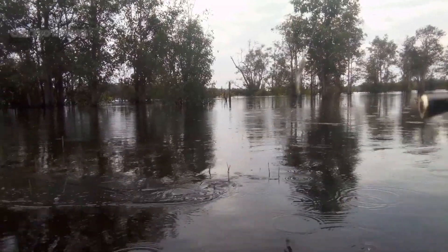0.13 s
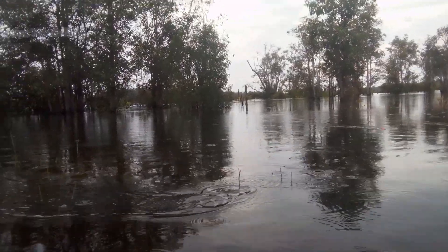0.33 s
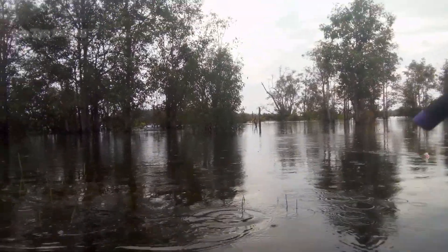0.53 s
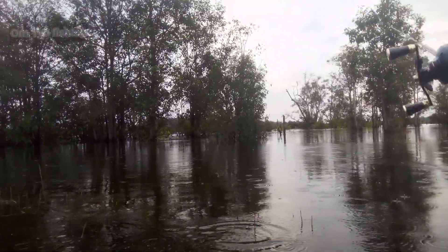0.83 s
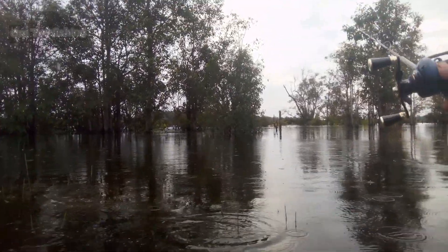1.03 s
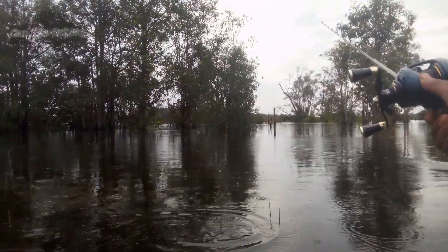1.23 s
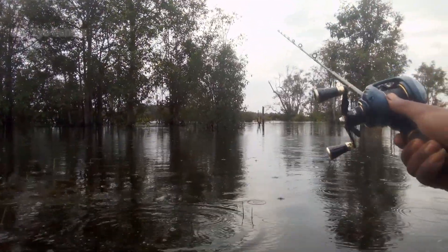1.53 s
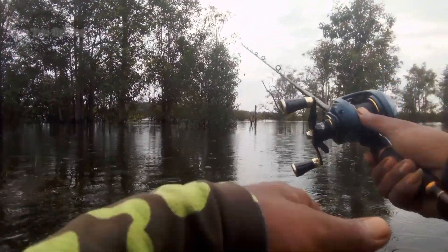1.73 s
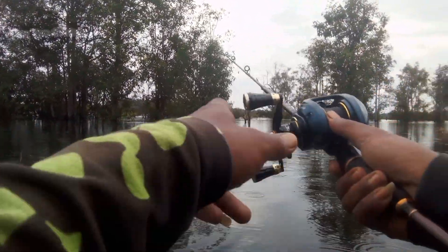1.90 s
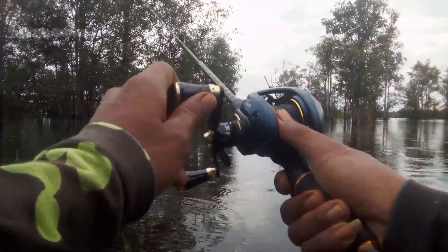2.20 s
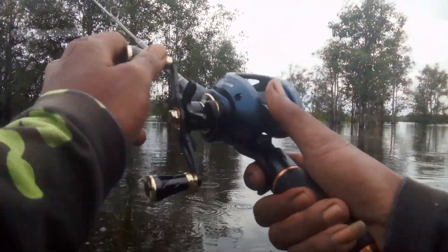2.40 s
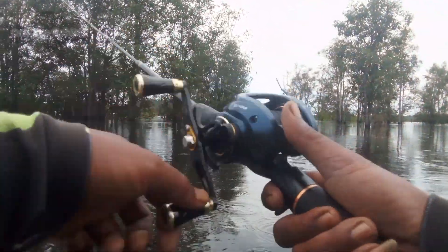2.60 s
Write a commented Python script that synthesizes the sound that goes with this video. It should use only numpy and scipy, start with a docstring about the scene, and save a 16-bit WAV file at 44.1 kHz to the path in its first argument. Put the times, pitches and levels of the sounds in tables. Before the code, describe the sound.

A fishing reel's free spool whirs through a cast, slows to a rattle, then clacks into gear

```python
"""Beside still water, a casting reel close to the microphone; a low wavering hum and patchy air lie under it all.
First drops and line guides plink (dying tones) and hands and reel click (noise bursts); a knock pushes the microphone.
The rod swings and line rips off in a coarse rush; the free spool rattles its frame with grains bunched once per turn,
hums at multiples of its speed and jolts as it slows, until the thumb stops it.
Last the clutch snaps in, ringing its modes, and the handle starts to rub the gears round."""
import sys
import numpy as np
from scipy import signal
from scipy.io import wavfile
from scipy.ndimage import uniform_filter1d

SR = 44100
rng = np.random.default_rng(int(sys.argv[2]) if len(sys.argv) > 2 else 0)


def materialize(psi):
    """Save the field psi as 16-bit PCM at rate SR to the path in sys.argv[1].

    A 1-D psi becomes a single channel; in a 2-D psi each row is a channel.
    """
    bounded = np.clip(np.atleast_2d(psi).T, -1, 1)
    quanta = np.round(bounded * 32767).astype(np.int16)
    wavfile.write(sys.argv[1], SR, quanta)


N = 121275


def amp(db):
    """Decibels to amplitude factor."""
    return 10 ** (np.asarray(db) / 20)


def rms_one(x):
    """Scale to rms 1."""
    return x / np.sqrt(np.mean(x ** 2) + 1e-20)


def in_time(rows):
    """Each column after the time, drawn as straight lines through its points."""
    times, *columns = np.transpose(rows)
    return [np.interp(np.arange(N) / SR, times, column) for column in columns]


def inside(rows):
    """One between the first and last row time, else zero."""
    t = np.arange(N) / SR
    return (t >= rows[0][0]) & (t <= rows[-1][0])


def level(rows):
    """Amplitude of a (t/s, level/dB) table, silent outside its times."""
    return amp(in_time(rows)[0]) * inside(rows)


def drift(rate_hz):
    """Slow chance of spread 1: white noise through a two-pole low-pass."""
    r = np.exp(-2 * np.pi * rate_hz / SR)
    noise = rng.standard_normal(N + SR)
    return rms_one(signal.lfilter([1], [1, -2 * r, r * r], noise)[SR:])  # first second lets it settle


def resonance(x, hz, width_hz):
    """One two-pole resonance."""
    r = np.exp(-np.pi * width_hz / SR)
    gain = (1 - r * r) / 2
    return signal.lfilter([gain, 0, -gain], [1, -2 * r * np.cos(2 * np.pi * hz / SR), r * r], x)


def body(x, peaks):
    """Parallel resonances, signs alternating; rms 1."""
    rings = [amp(db) * resonance(x, hz, width_hz) for hz, width_hz, db in peaks]
    return rms_one(sum((-1) ** k * ring for k, ring in enumerate(rings)))


def band(x, kind, hz, order=2):
    """Butterworth filter."""
    return signal.sosfilt(signal.butter(order, hz, kind, fs=SR, output="sos"), x)


def grains(per_s):
    """Random clicks of uneven size and sign, scaled so that their power does not follow their rate."""
    sizes_db = 3 * np.minimum(rng.exponential(1, N), 5)
    sizes = amp(sizes_db) * rng.choice([-1, 1], N)
    return sizes * (rng.random(N) < per_s / SR) / np.sqrt(per_s)


def since(start_s):
    """Seconds since the start, zero before it."""
    return np.maximum(np.arange(N) / SR - start_s, 0)


def dying(start_s, t60_s):
    """Exponential decay by 60 dB per t60, zero before the start."""
    t = since(start_s)
    return (t > 0) * amp(-60 * np.minimum(t / t60_s, 3))


# the free spool's speed: t/s, speed/(turns per s)
SPOOL_SPEED = [(.7, 148), (.76, 221), (.87, 205), (.97, 195), (1.05, 189), (1.2, 162), (1.29, 150),
               (1.46, 121.7), (1.65, 109.7), (1.76, 69), (1.95, 42.2), (2.09, 35.5), (2.25, 35.3),
               (2.36, 28)]


def spool_motion():
    """Speed in turns per second, and the angle in radians that it adds up to."""
    speed, = in_time(SPOOL_SPEED)
    return speed, 2 * np.pi * np.cumsum(speed) / SR


# delay of the path off a near surface, shrinking as the reel is brought in: t/s, delay/ms
NEAR_SURFACE = [(.7, .16), (.95, .156), (1.5, .14), (1.78, .136), (1.95, .122), (2.2, .113), (2.4, .112)]


def reflected(x):
    """Direct sound plus a weaker copy a fraction of a millisecond late; rms 1."""
    delay_samples = in_time(NEAR_SURFACE)[0] * SR / 1000
    late = np.interp(np.arange(N) - delay_samples, np.arange(N), x)
    return rms_one(x + 0.65 * late)


# overall rattle: t/s, level/dB
RATTLE_LEVEL = [(0.69, -71), (0.722, -38), (0.744, -29), (0.87, -37), (0.892, -33.5), (0.934, -38.5),
                (0.958, -35.5), (1.054, -42), (1.516, -39), (1.928, -42), (2.104, -47), (2.114, -45.5),
                (2.182, -47), (2.202, -42), (2.248, -52), (2.294, -40), (2.34, -51), (2.35, -85)]
# spread over the frame, added to the rattle: t/s, then low, middle, upper, bright and hiss level/dB
RATTLE_COLOUR = [(.69, 6, -12, -5, -22, -20), (.73, -2, -2.5, -10, -31, -29),
                 (.76, -5, -4.5, -14.5, -12, -15), (.8, -4, -5.5, -8, -7, -13.5),
                 (.86, -1.5, -1.5, -2.5, -3.5, -8.5), (.95, -2.5, -2, -6, -3, -10),
                 (1.1, -3.5, 0.5, -2, -2.5, -5.5), (1.28, -3.5, -2.5, -5, -15, -10),
                 (1.5, -3.5, -1, -10.5, -11, -12), (1.7, -4.5, -2.5, -13.5, -13, -16.5),
                 (1.9, -2, -2.5, -13.5, -16.5, -20.5), (2.05, -0.5, -5, -10, -20.5, -17),
                 (2.22, -3.5, -6.5, -14, -22, -20.5), (2.3, -1, -8, -14.5, -25, -25),
                 (2.35, -1, -3, -6, -26, -26)]
# resonances of the reel frame, from low ring to hiss: f/Hz, width/Hz, relative level/dB
LOW_RING = [(426, 123, -14), (757, 94, -7), (907, 74, -1), (1086, 45, -3), (1229, 59, 3), (1468, 213, -2),
            (1689, 89, 3)]
MIDDLE_RING = [(1937, 93, -1), (2140, 145, 0.5), (2340, 85, 3.5), (2599, 66, -3), (2894, 167, -2.5)]
UPPER_RING = [(3117, 76, -1), (3276, 23, -3.5), (3493, 96, 0), (4038, 134, -1), (4284, 36, 0.5),
              (4550, 1540, -12)]
BRIGHT_RING = [(5600, 800, -5.5), (5940, 130, 1), (6700, 310, 6.5), (7400, 700, -8.5)]
HISS_RING = [(8170, 1150, 0.25), (10260, 1300, 0.089), (11800, 1800, 0.096), (14500, 890, -1.9)]
GRAINS_PER_TURN, GRAIN_FLOOR_PER_S = 25, 2500
# swing once per turn; swing twice per turn, growing towards rest; chance wobble
TURN_SWING_DB, SECOND_LOBE_DB, WOBBLE_DB = 3, 5.5, 1.2


def bearing_rattle():
    """Bearing grains bunch with each turn and ring the frame; a second bunch grows as the spool slows."""
    speed, turn = spool_motion()
    slow = 1 - speed / speed.max()
    once = TURN_SWING_DB * np.cos(turn)
    twice = SECOND_LOBE_DB * slow ** 2 * np.cos(2 * turn)
    wobble = WOBBLE_DB * (drift(35) + .5 * drift(4))
    gate = amp(once + twice + wobble)

    rate = GRAINS_PER_TURN * speed + GRAIN_FLOOR_PER_S
    shared = grains(rate)
    # the treble is half noise and follows the turns less deeply
    smooth = gate ** 0.56 * (0.9 * shared + rng.standard_normal(N) * shared.std())
    rings = [
        band(body(gate * shared, LOW_RING), "low", 2860),
        body(gate * (.5 * shared + grains(rate)), MIDDLE_RING),
        body(gate * (1.2 * shared + grains(rate)), UPPER_RING),
        band(body(smooth, BRIGHT_RING), "high", 3900),
        reflected(band(body(smooth, HISS_RING), "high", 7100, order=3)),
    ]
    rattle = sum(amp(db) * ring for db, ring in zip(in_time(RATTLE_COLOUR), rings))
    return level(RATTLE_LEVEL) * rattle


# harder jolts of the slowing spool: t/s, level/dB (before a common 7 dB cut)
SPOOL_JOLTS = [(1.572, -24), (1.8, -28), (1.835, -33), (1.912, -27.5), (2.083, -29), (2.11, -30.5),
               (2.142, -31), (2.17, -31.5), (2.2, -26), (2.229, -29), (2.266, -30), (2.285, -24.5),
               (2.295, -30)]


def spool_jolts():
    """Each jolt is a short swell and decay of grains ringing the frame."""
    frame = body(grains(4400.0), LOW_RING[1:] + MIDDLE_RING)
    envelope = 0
    for start_s, db in SPOOL_JOLTS:
        attack = np.minimum(since(start_s) / 0.0014, 1)
        envelope = envelope + amp(db - 7) * dying(start_s, 0.029) * attack
    return frame * envelope


# hum at 1 to 4 times the spool speed: t/s, then four level/dB (before a common 4.5 dB lift)
UNBALANCE = [(.72, -80, -53, -57, -71), (.77, -56, -47, -58, -49.5), (.9, -50, -53.5, -61.5, -48),
             (1.0, -53.5, -62, -61, -71), (1.15, -53, -63, -65, -56.5), (1.3, -60.5, -75, -59, -98),
             (1.5, -59.5, -85, -56, -74), (1.64, -51, -81, -62.5, -65), (1.75, -75, -86, -87, -69),
             (1.9, -67, -90, -92, -85)]


def unbalance_tones():
    """The unbalanced spool hums at low multiples of its speed, with wavering phase and level."""
    _, turn = spool_motion()
    angle = turn + 0.185 * drift(11.6)
    tones = 0
    for multiple, db in enumerate(in_time(UNBALANCE), start=1):
        tones = tones + amp(db + 4.5 + 1.6 * drift(13)) * np.sin(multiple * angle)
    return inside(UNBALANCE) * tones


# line ripping off at the launch: t/s, level/dB
LAUNCH_LEVEL = [(.705, -69), (.722, -42.5), (.75, -30), (.77, -32.5), (.81, -27), (.825, -29), (.87, -50)]
# its broad colour: f/Hz, width/Hz, relative level/dB
LAUNCH_RING = [(1690, 340, -4), (1990, 320, 4), (2800, 530, -2.5), (3530, 280, 0.5), (8360, 1700, -12.5)]


def launch():
    """A short coarse rush of grains as line and spool are jerked up to speed."""
    return level(LAUNCH_LEVEL) * band(body(grains(5000.), LAUNCH_RING), "high", 620)


# touches as the clutch snaps in: t/s, level/dB (before a common 10 dB cut)
CLUTCH_TOUCHES = [(2.487, -28), (2.4895, -14.5), (2.4958, -22), (2.5003, -19.5), (2.5035, -30),
                  (2.5059, -23.5), (2.523, -47)]
# modes of the mechanism: f/Hz, relative level/dB, t60/s
MECHANISM_MODES = [(147, -12, 0.049), (930, -18, 0.044), (1790, -5, .012), (2250, -4.5, .015),
                   (2710, -8, 0.019), (3220, -9.5, 0.018), (3670, 3, 0.0063), (4550, -14, 0.0036),
                   (6220, -12, 0.015), (7130, -6, 0.008), (8200, -8.5, 0.0033), (10800, -8, 0.01),
                   (14400, -12, 0.0046)]
# chatter around the touches: t/s, level/dB (before it is scaled into crunch and modes)
CLUTCH_CHATTER = [(2.4865, -58), (2.492, -32), (2.509, -32), (2.516, -44.5), (2.528, -58)]


def clutch():
    """A few touches and a short chatter ring the modes of the mechanism, under a crunch of noise."""
    chatter = level(CLUTCH_CHATTER) * rms_one(grains(np.full(N, 1500.)))
    times, touch_db = np.transpose(CLUTCH_TOUCHES)
    envelope = sum(amp(db - 10) * dying(start_s, 0.0077) for start_s, db in CLUTCH_TOUCHES)
    snaps = envelope * rng.standard_normal(N)
    out = amp(0.5) * band(snaps + 0.34 * chatter, "band", [900, 12000], order=1)
    for hz, db, t60_s in MECHANISM_MODES:
        strikes = 0.067 * chatter
        # each touch strikes each mode a little differently
        strikes[(times * SR).astype(int)] += amp(touch_db - 10 + rng.normal(0, 3, len(times)))
        r = amp(-60 / (t60_s * SR))
        w = 2 * np.pi * hz / SR
        ring = [0, amp(db) * np.sin(w)], [1, -2 * r * np.cos(w), r * r]
        out = out + signal.lfilter(*ring, strikes + 1e-18)
    return out


# the knock on the microphone: push level/dB, push f/Hz, push t60/s, edge level/dB, crack level/dB
MICROPHONE_KNOCK = (-8.5, 84, .036, -4, -21)
KNOCK_S = .2194


def knock():
    """A sharp inward edge, a slow dying swing back and a bright crack that starts just ahead."""
    push_db, hz, t60_s, edge_db, crack_db = MICROPHONE_KNOCK
    t = since(KNOCK_S)
    push = amp(push_db) * dying(KNOCK_S, t60_s) * np.sin(2 * np.pi * hz * t + .35)
    edge = -amp(edge_db) * dying(KNOCK_S, .012) * np.minimum(t / .00025, 1)
    noise = rng.standard_normal(N)
    bright = 0.66 * noise + 3 * resonance(noise, 3850, 600) + 1.26 * resonance(noise, 10750, 800)
    envelope = dying(KNOCK_S - .0003, .008) + .1 * dying(KNOCK_S - .0025, .04)
    return band(push, "low", 1350) + edge + amp(crack_db) * envelope * bright


# the handle starts to turn: t/s, level/dB
HANDLE_TURN = [(2.56, -95), (2.61, -62), (2.65, -61.5), (2.69, -55), (2.73, -52.5), (2.74, -62),
               (2.75, -61)]


def gears():
    """The gears rub: sparse grains ring parts of the reel frame."""
    return level(HANDLE_TURN) * body(grains(900.), LOW_RING[4:] + MIDDLE_RING + UPPER_RING[2:3])


# dry clicks and short scuffs of reel and hands: t/s, level/dB, t60/s, centre f/Hz, width/Hz
HANDLING_CLICKS = [(.008, -48, 0.011, 1470, 3800), (0.067, -54, 0.23, 1400, 2400),
                   (.18, -44.5, 0.032, 2310, 900), (.18, -47, 0.014, 4050, 890),
                   (.364, -65, .01, 9500, 3900), (.4, -53, .01, 10000, 5000), (.42, -60, .02, 11000, 3000),
                   (0.516, -55, 0.042, 1480, 2500), (.52, -65, 0.14, 9900, 5000),
                   (2.328, -47, 0.017, 4960, 1500), (2.329, -47, 0.01, 12050, 8990),
                   (2.342, -52, .01, 5000, 8900), (2.363, -58, 0.012, 11000, 2000),
                   (2.527, -54, 0.09, 1920, 2480), (2.562, -49.5, 0.034, 2000, 980),
                   (2.608, -55, 0.037, 1640, 1000), (2.665, -47.5, 0.1, 2000, 700),
                   (2.6745, -45.5, 0.028, 3100, 2800), (2.381, -62, .02, 1200, 1500),
                   (2.388, -61, 0.019, 1200, 1500)]


def clicks():
    """Dying bursts of noise, each through two equal resonances."""
    noise = rng.standard_normal(N)
    out = np.zeros(N)
    for start_s, db, t60_s, hz, width_hz in HANDLING_CLICKS:
        colour = resonance(resonance(noise, hz, width_hz), hz, width_hz)
        out += amp(db) * dying(start_s, t60_s) * rms_one(colour)
    return out


# plinks of drops and line guides: t/s, level/dB, f/Hz, t60/s
DROP_PLINKS = [(0.028, -44, 1470, 0.03), (.068, -36, 247, 0.16), (.07, -48.5, 404, 0.11),
               (.084, -44, 3680, 0.017), (0.097, -42.5, 2960, 0.027), (.098, -43, 3580, 0.017),
               (.2, -53, 2840, 0.018), (.28, -52, 2760, 0.027), (.301, -50, 786, 0.045),
               (.37, -51.5, 3070, .04), (0.389, -43.5, 1060, 0.057), (0.389, -39.5, 466, 0.035),
               (.515, -47.5, 855, 0.035), (0.619, -54, 3020, 0.036), (.713, -31, 424, 0.033),
               (2.427, -22, 766, 0.02), (2.44, -39.5, 755, 0.047), (2.454, -37, 785, 0.021),
               (2.676, -40, 480, 0.058)]


def plinks():
    """Dying sine tones with a soft start."""
    out = np.zeros(N)
    for start_s, db, hz, t60_s in DROP_PLINKS:
        t = since(start_s)
        attack = np.minimum(t / 0.0024, 1)
        out += amp(db) * dying(start_s, t60_s) * attack * np.sin(2 * np.pi * hz * t)
    return out


# low rumble of movement: t/s, level/dB
MOVEMENT = [(0, -51), (.1, -55), (.15, -42.5), (.2, -69), (.3, -68), (.76, -53.5), (.82, -45), (.88, -121),
            (2.5, -52), (2.75, -51.5)]


def movement_rumble():
    """Noise between 50 and 130 Hz that comes and goes."""
    return amp(in_time(MOVEMENT)[0]) * rms_one(band(rng.standard_normal(N), "band", [50, 130]))


# wavering hum: t/s, level/dB
HUM_LEVEL = [(0, -48), (.7, -56.5), (1.1, -53.5), (1.4, -64), (2.0, -64), (2.4, -68), (2.75, -66)]
HUM_HZ, HUM_WIDTH_HZ = 156.6, 8.8  # width of each of two equal resonances


def hum():
    """Noise through two narrow resonances, so the tone wavers."""
    once = resonance(rng.standard_normal(N), HUM_HZ, HUM_WIDTH_HZ)
    return amp(in_time(HUM_LEVEL)[0]) * rms_one(resonance(once, HUM_HZ, HUM_WIDTH_HZ))


# spectrum of the outdoor air: f/Hz, relative level per Hz/dB
AIR_SPECTRUM = [(15, -49), (25, 15), (166, -8), (416, -20.5), (503, -23.5), (714, -19.5), (1480, -30),
                (2480, -22), (2840, -32.5), (3160, -27.5), (8140, -49.5), (14400, -36), (16000, -59)]
AIR_DB, AIR_PATCHY_DB = -55, 3.56  # rms of the whole; chance spread of each band


def outdoor_air():
    """Half-octave bands of noise, each drifting in level on its own."""
    spectrum_hz, spectrum_db = np.transpose(AIR_SPECTRUM)
    edges = 25 * 2 ** np.arange(0, 9.6, .5)
    white = rng.standard_normal((2, N))  # neighbouring bands take turns, so they do not share noise
    air = 0
    for k, (low, high) in enumerate(zip(edges, edges[1:])):
        db = np.interp(np.log(low * high) / 2, np.log(spectrum_hz), spectrum_db)
        air = air + amp(db + AIR_PATCHY_DB * drift(24)) * band(white[k % 2], "band", [low, high])
    return amp(AIR_DB) * rms_one(band(air, "high", 92, order=3))


def scene():
    """All sources at one microphone, as one channel."""
    spool = bearing_rattle() + spool_jolts() + unbalance_tones()
    reel = spool + launch() + clutch()
    handling = knock() + gears() + clicks() + plinks()
    background = movement_rumble() + hum() + outdoor_air()
    return (reel + handling + background)[None]


DUCK_ABOVE_DB, DUCK_RATIO = -17, 0.72  # peak level where ducking starts; dB of cut per dB above it
DUCK_LAG_S, DUCK_RELEASE_DB_PER_S = 0.011, 111
MIC_LOW_CUT_HZ, CUTOFF_HZ = 45, 15700


def record(dry):
    """Gain control ducks just after loud peaks and recovers; both ends of the spectrum are cut."""
    slope = DUCK_RELEASE_DB_PER_S * np.arange(N) / SR
    peak_db = 20 * np.log10(np.abs(dry[0]) + 1e-9)
    held_db = np.maximum.accumulate(peak_db + slope) - slope  # jumps up with a peak, then falls steadily
    duck_db = uniform_filter1d(DUCK_RATIO * np.maximum(held_db - DUCK_ABOVE_DB, 0), size=300)
    late_db = np.interp(np.arange(N) - DUCK_LAG_S * SR, np.arange(N), duck_db)
    ducked = band(dry * amp(-late_db), "high", MIC_LOW_CUT_HZ)
    return signal.sosfilt(signal.ellip(12, .3, 60, CUTOFF_HZ, fs=SR, output="sos"), ducked)


dry = scene()
out = record(dry)
materialize(out)
```